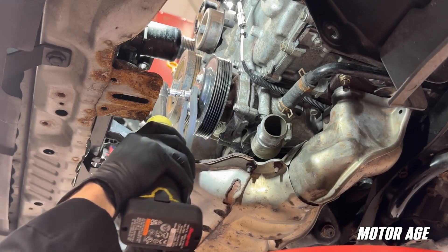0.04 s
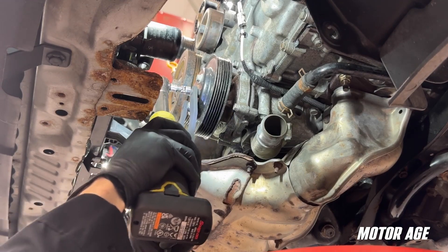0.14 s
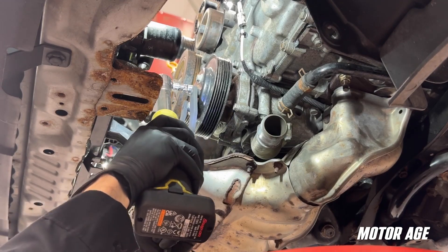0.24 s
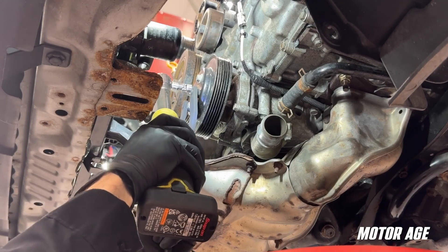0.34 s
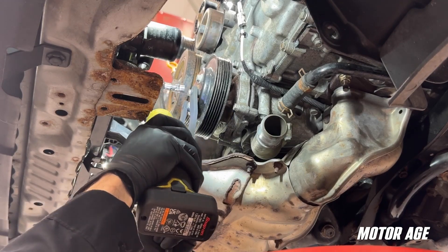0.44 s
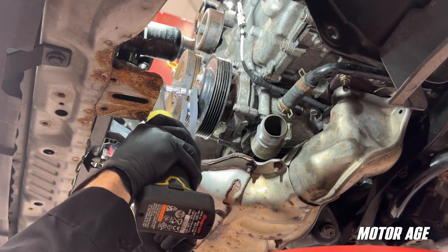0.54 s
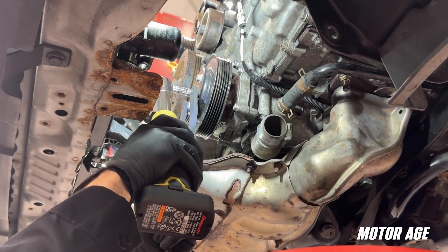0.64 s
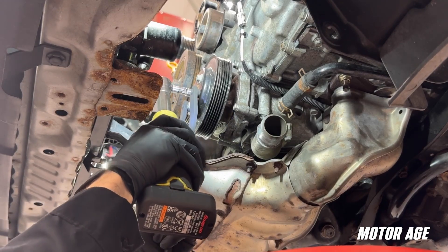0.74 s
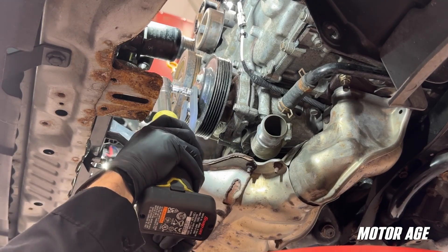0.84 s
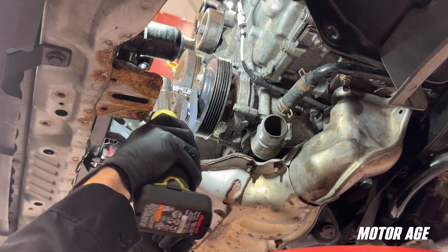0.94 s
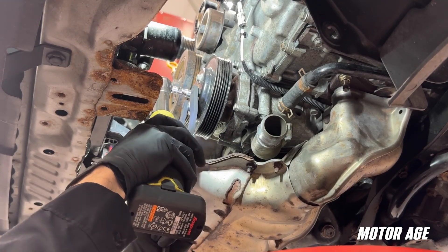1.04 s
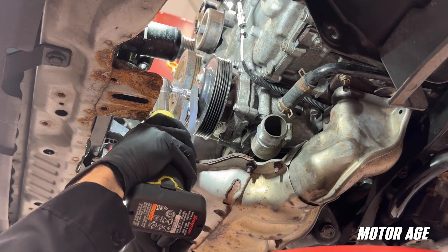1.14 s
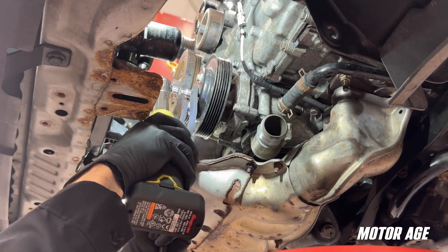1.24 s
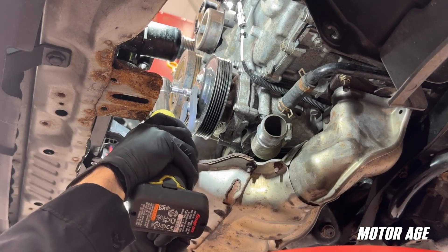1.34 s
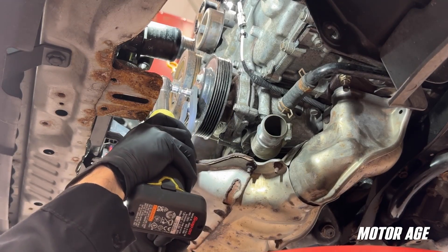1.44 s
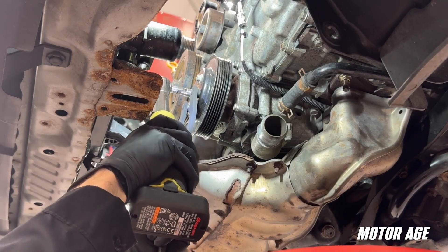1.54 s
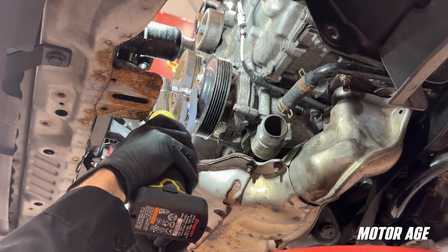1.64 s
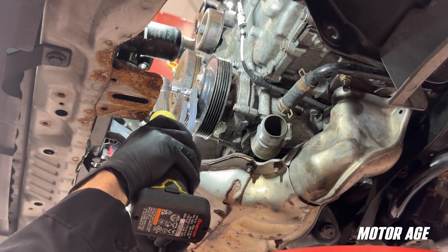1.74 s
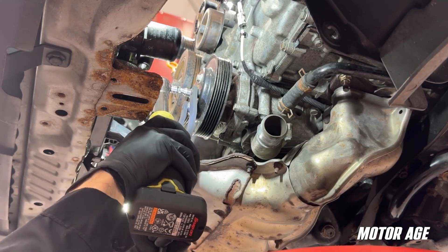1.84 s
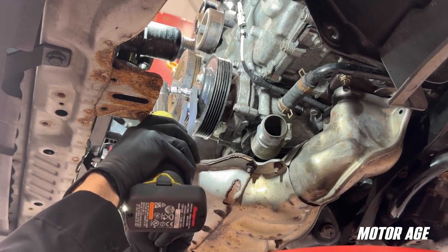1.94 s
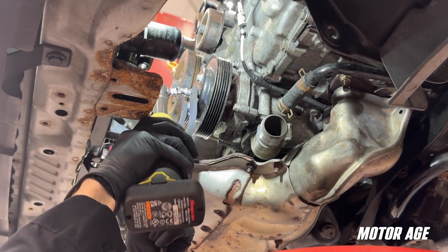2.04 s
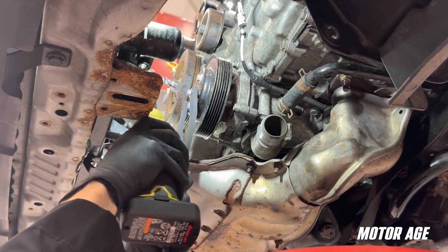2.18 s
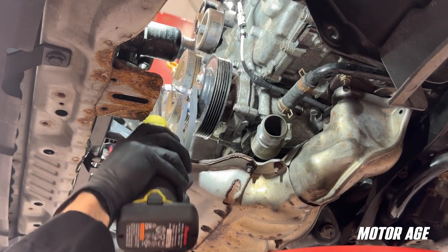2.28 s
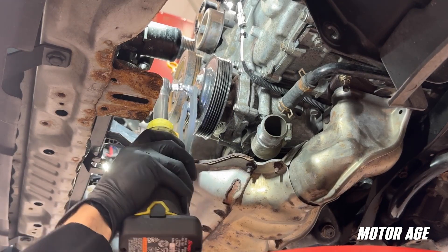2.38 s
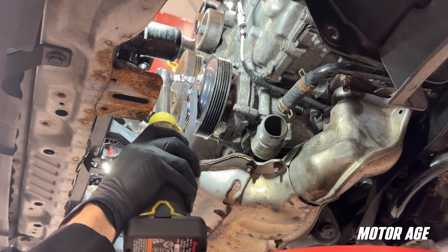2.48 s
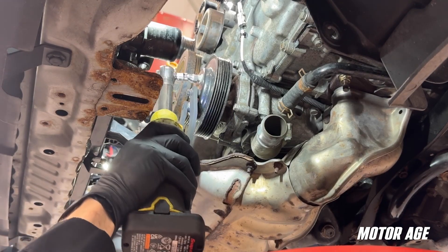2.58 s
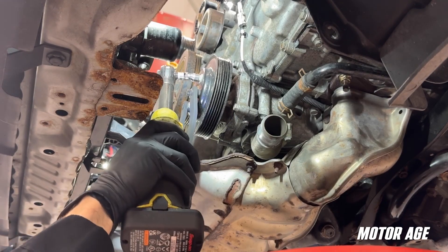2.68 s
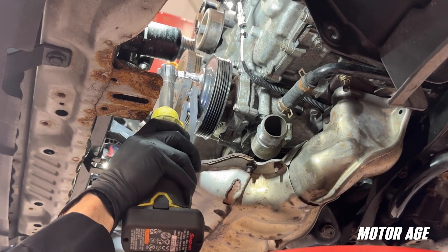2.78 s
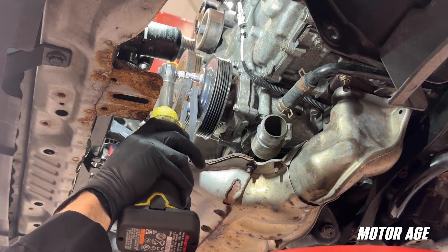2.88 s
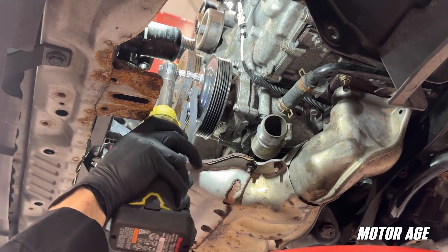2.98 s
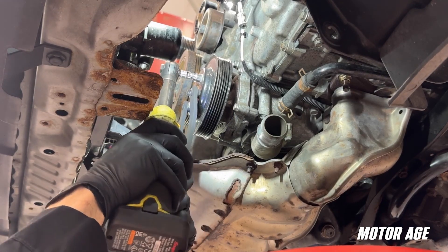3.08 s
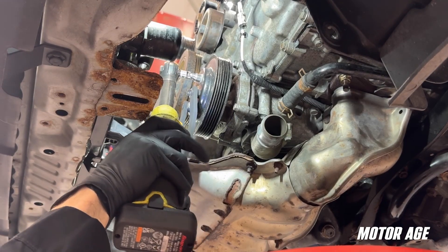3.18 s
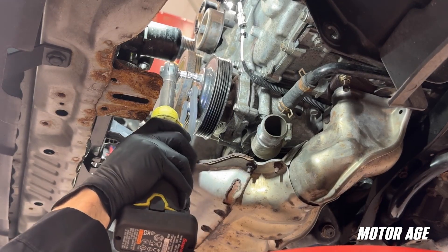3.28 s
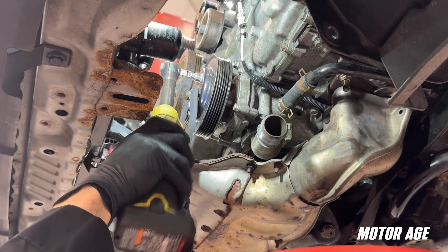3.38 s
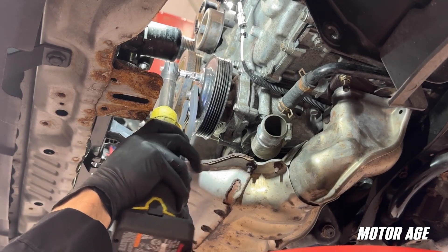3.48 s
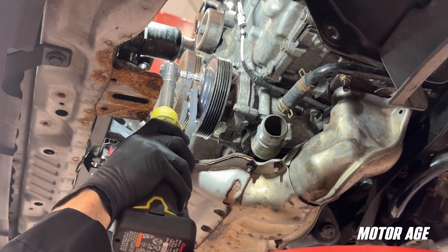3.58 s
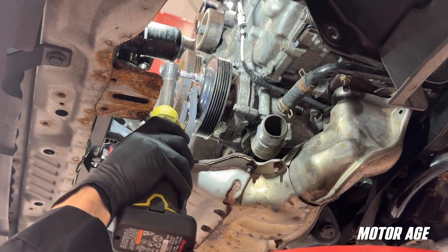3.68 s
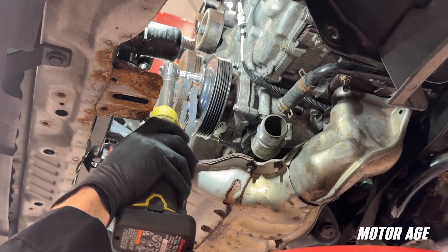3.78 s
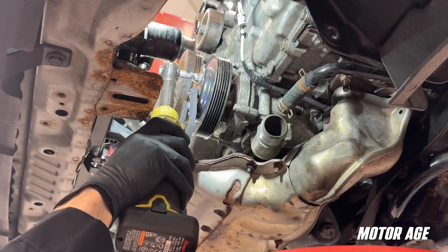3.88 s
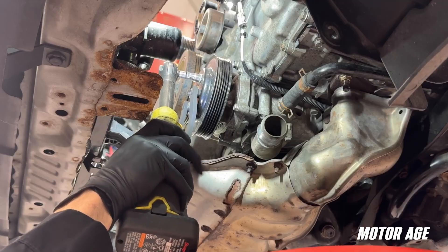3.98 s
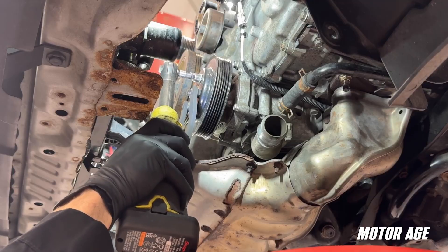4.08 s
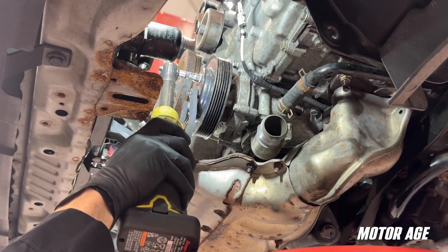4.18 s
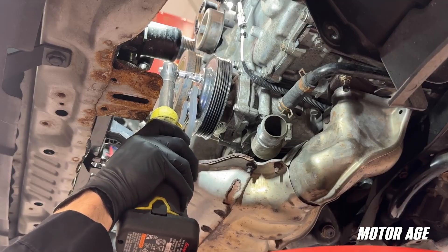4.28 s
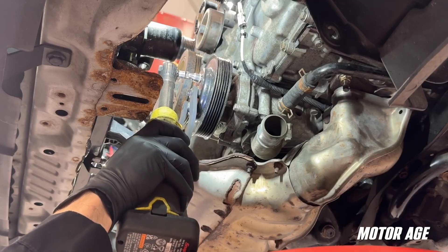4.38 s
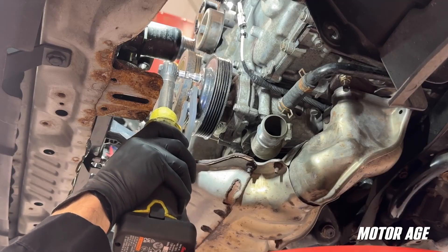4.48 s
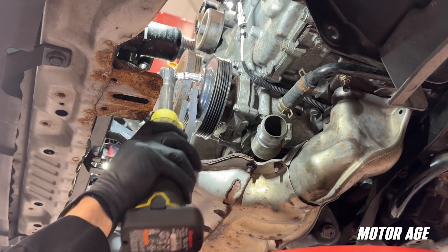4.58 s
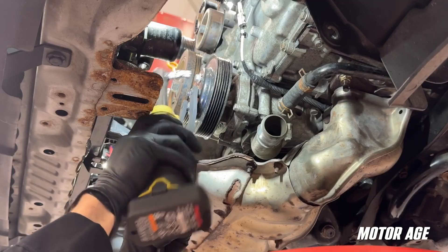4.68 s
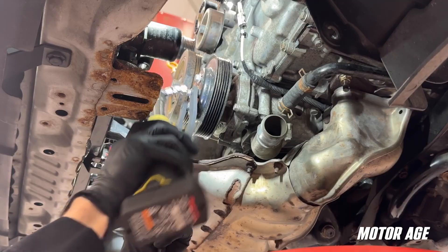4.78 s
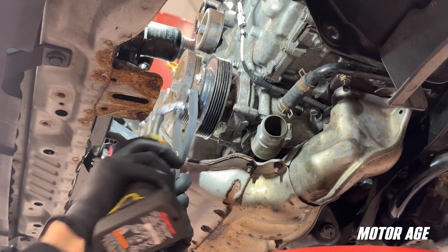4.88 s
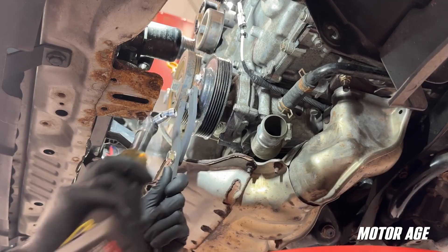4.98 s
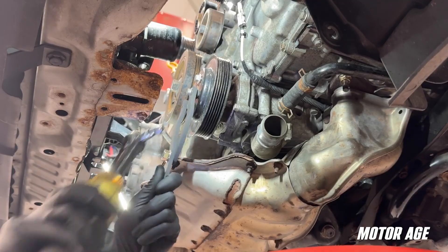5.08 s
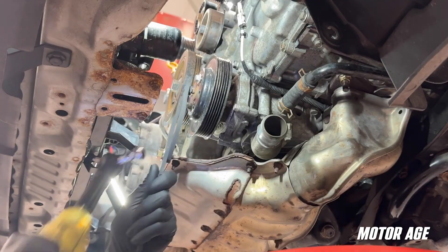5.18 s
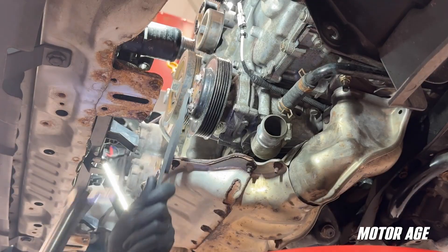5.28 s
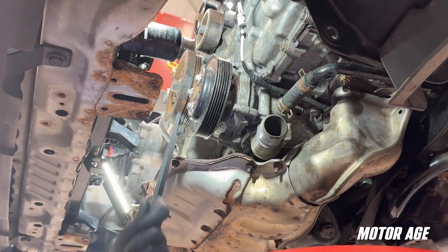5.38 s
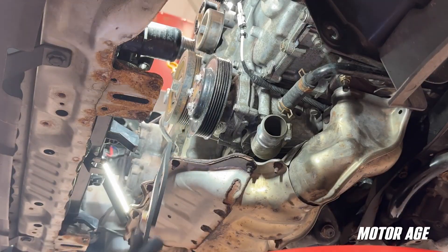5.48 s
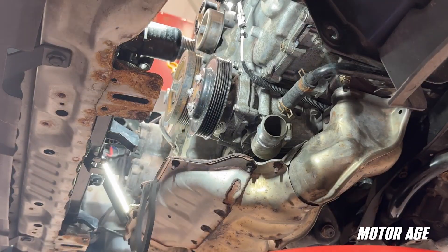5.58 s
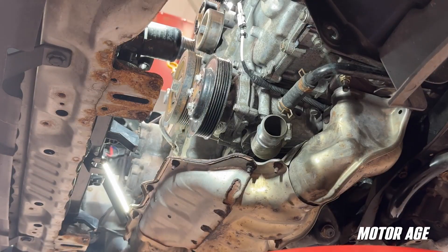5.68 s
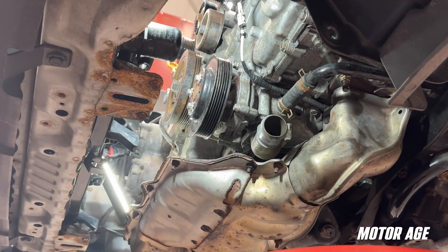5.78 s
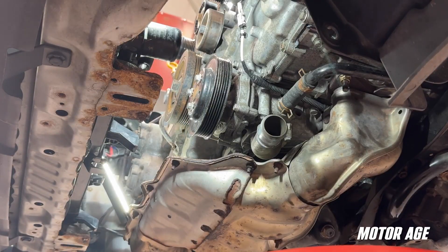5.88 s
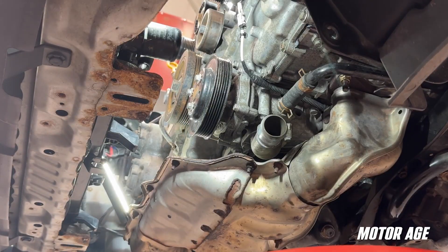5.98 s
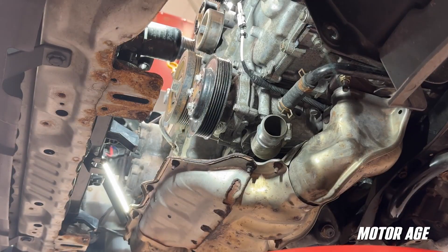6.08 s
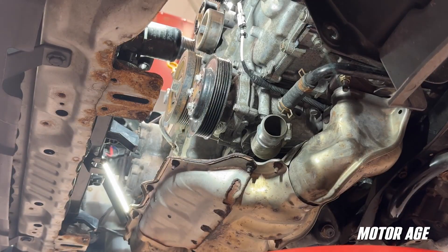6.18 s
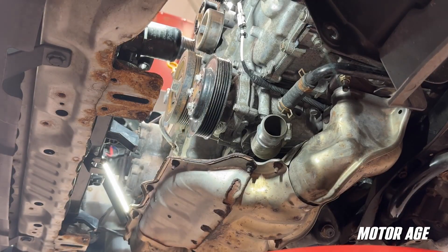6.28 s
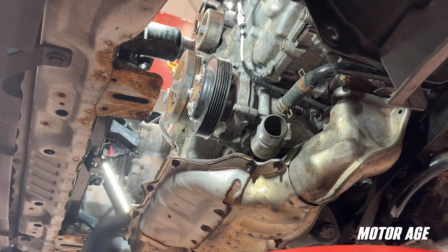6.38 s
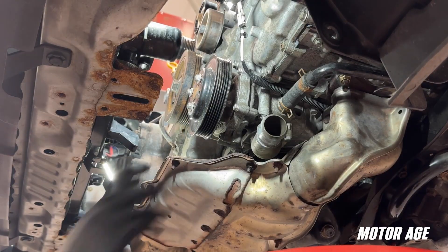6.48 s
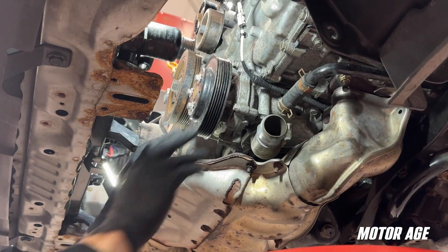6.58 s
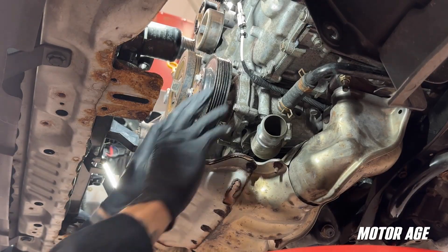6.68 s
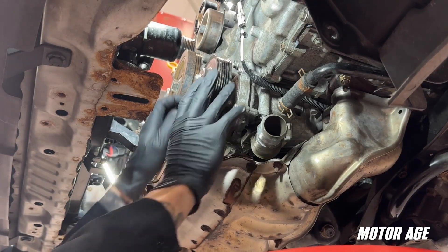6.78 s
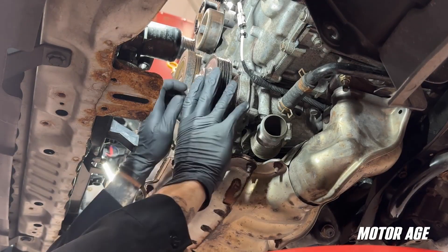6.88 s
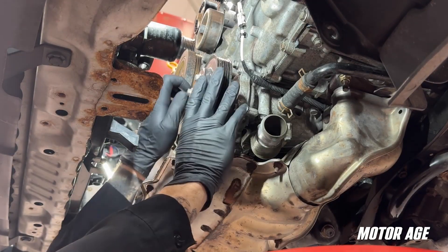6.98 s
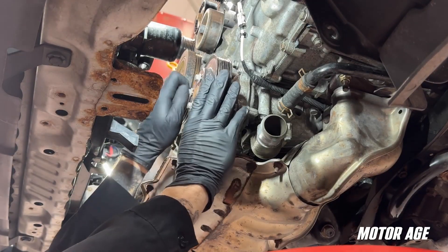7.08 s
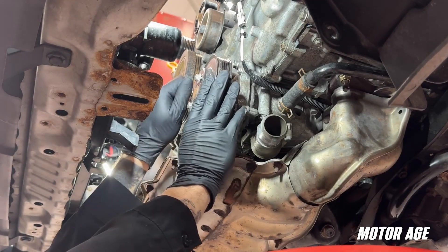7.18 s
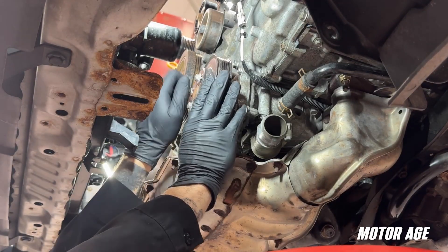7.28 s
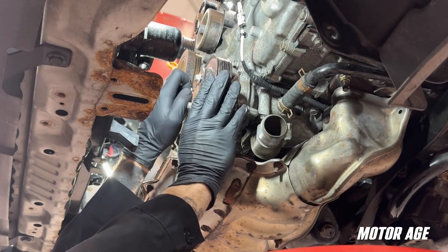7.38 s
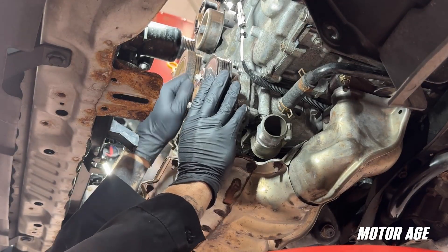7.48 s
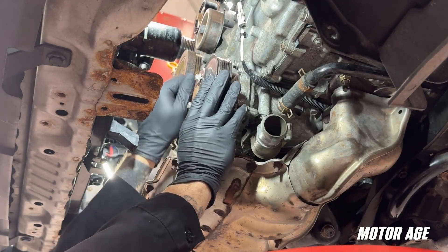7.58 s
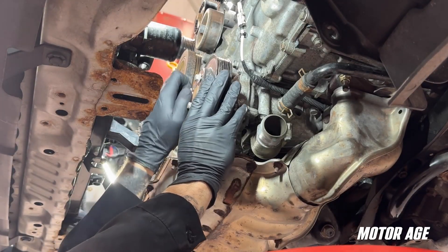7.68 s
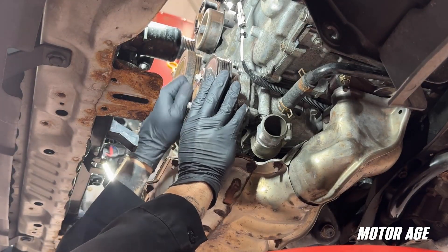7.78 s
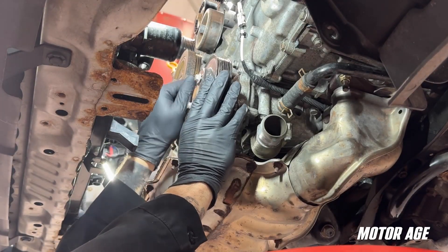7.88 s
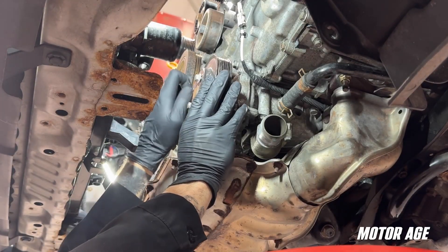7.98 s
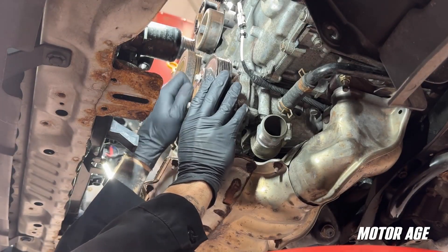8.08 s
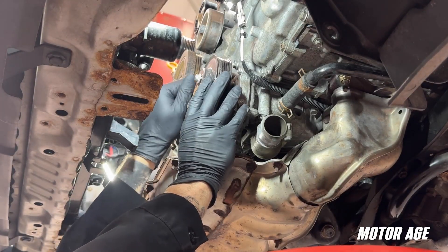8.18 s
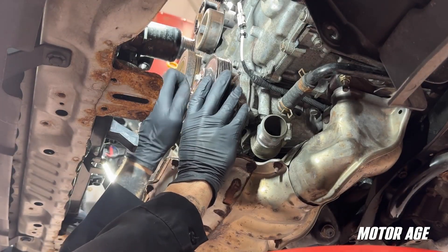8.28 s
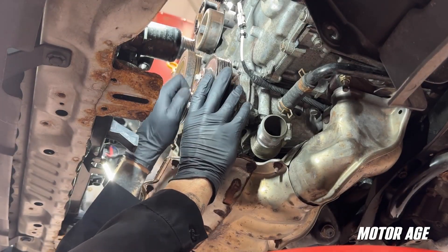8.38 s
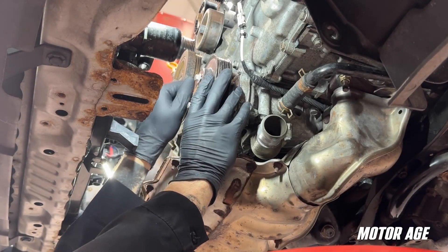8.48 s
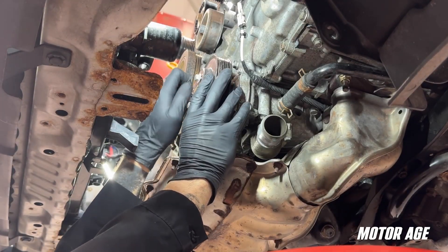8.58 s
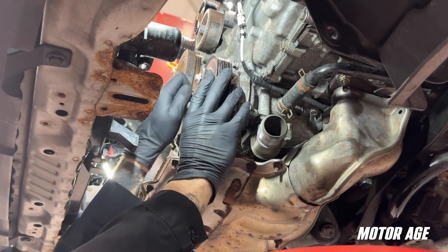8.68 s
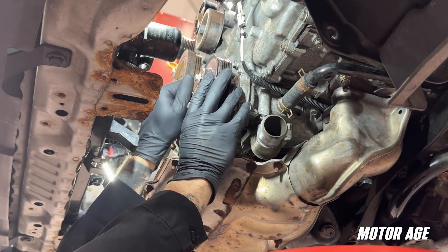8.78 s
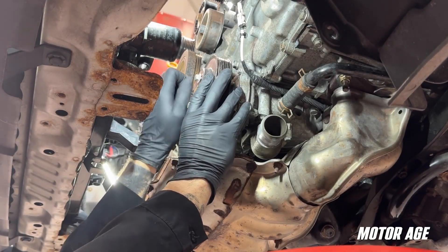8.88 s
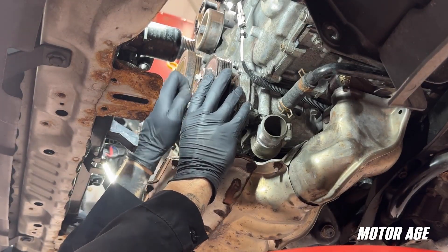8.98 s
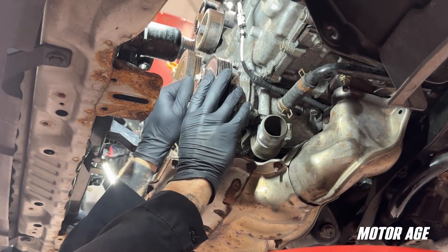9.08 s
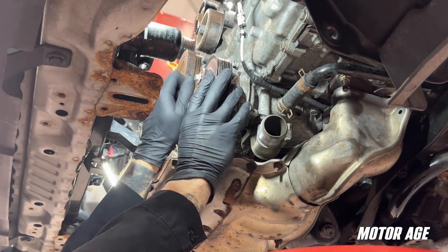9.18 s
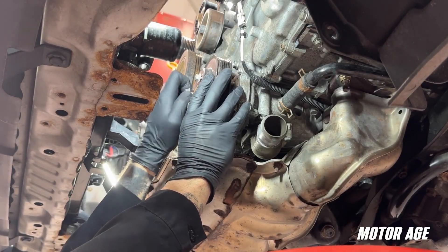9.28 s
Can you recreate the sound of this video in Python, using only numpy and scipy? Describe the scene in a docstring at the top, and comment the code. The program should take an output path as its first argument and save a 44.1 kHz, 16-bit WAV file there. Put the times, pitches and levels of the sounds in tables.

```python
"""First comes a low ventilation rumble, with the echo of an earlier burst dying away in a workshop.
Then a cordless driver, close by, backs two pulley bolts out under a car, with four trigger pulls a bolt.
Its motor spins up and coasts down; its hammer knocks three times a cycle, louder with speed: shaped bursts of noise.
The tool clunks on and off the bolt heads (dying noise), and a steel holding wrench clinks free (ringing sines).
Last, gloved fingers turn a loose bolt in even strokes: trains of tiny random slips and snaps of noise."""
import sys
import numpy as np
from scipy import signal
from scipy.fft import rfft, irfft
from scipy.io import wavfile
from scipy.ndimage import uniform_filter1d

SR = 44100
rng = np.random.default_rng(int(sys.argv[2]) if len(sys.argv) > 2 else 0)


def wav_out(sig):
    """Save sig, one row per channel (or a flat mono array), as 16-bit PCM at SR to the path in sys.argv[1]."""
    wavfile.write(sys.argv[1], SR, np.round(np.clip(np.atleast_2d(sig).T, -1, 1) * 32767).astype(np.int16))


N = 411894
TIME = np.arange(N) / SR


def gain_of(db):
    """Turns decibels into amplitude."""
    return 10 ** (np.asarray(db) / 20)


def evened(x):
    """Scales a sound to an rms of 1."""
    return x / np.sqrt(np.mean(x ** 2) + 1e-20)


def read(points, hz):
    """Reads between the points of a spectrum table, along a log-frequency axis."""
    f, value = np.transpose(points)
    return np.interp(np.log(hz + 1), np.log(f + 1), value)


def peaks_db(modes, hz):
    """Resonances as rounded peaks in dB, from rows of (f/Hz, width/Hz, level/dB)."""
    return sum(db / (1 + (2 * (hz - f) / width) ** 2) for f, width, db in modes)


def add(mix, s, sound):
    """Mixes a sound in at time s, cut off at the end of the mix."""
    part = mix[round(s * SR):][:len(sound)]
    part += sound[:len(part)]


def coloured(x, db_at, size=4096):
    """Filters without pre-ringing to the colour db_at(Hz); white noise keeps its overall level."""
    hz = abs(np.fft.fftfreq(size, 1 / SR))
    log_gain = np.log(gain_of(np.maximum(db_at(hz), -100)))
    # the Hilbert transform gives the minimum-phase response
    taps = np.fft.ifft(np.exp(np.conj(signal.hilbert(log_gain)))).real
    return signal.oaconvolve(x, taps / np.linalg.norm(taps))[:len(x)]


def dying_noise(seconds, db_at, t60_at, size=128):
    """Noise in which every band has its own level and its own time to fall by 60 dB."""
    n = int(seconds * SR)
    gain = gain_of(db_at(np.fft.rfftfreq(n, 1 / SR)))
    noise = irfft(rfft(rng.standard_normal(n)) * gain, n)
    hz, t, z = signal.stft(noise, SR, nperseg=size)
    fade = gain_of(-60 * t / t60_at(hz)[:, None])
    return signal.istft(z * fade, SR, nperseg=size)[1]


def grains(size, per_s, spread_db):
    """A random train of small slips, a few of them large."""
    slips = (rng.random(size) < per_s / SR) * rng.standard_normal(size)
    size_db = spread_db * np.minimum(rng.exponential(1, size), 4)
    return evened(slips * gain_of(size_db))


# colour of the moving air: (f/Hz, relative level/dB)
AIR_COLOUR = [(20, -1), (55, 1.5), (90, -5), (180, -15.5), (300, -22), (550, -23.5), (750, -22),
              (1050, -24), (1380, -20), (1650, -35), (2500, -41.5), (6000, -48), (12000, -54.5),
              (14000, -61)]


def ventilation(level_db=-57):
    """Moving air: steady noise, strongest in the bass."""
    gain = gain_of(read(AIR_COLOUR, np.fft.rfftfreq(N, 1 / SR)))
    air = irfft(rfft(rng.standard_normal(N)) * gain, N)
    return gain_of(level_db) * evened(air)


def hum(peak_s, hz, db, rise_db_per_s, fall_db_per_s, waver_hz=0.92, sag_hz_per_s=1):
    """A distant machine: a wavering tone that swells, fades and slowly sags in pitch."""
    t = TIME - peak_s
    waver = waver_hz * evened(uniform_filter1d(rng.standard_normal(N), size=6000))
    turns = np.cumsum(hz - sag_hz_per_s * t + waver) / SR
    level_db = db + np.minimum(rise_db_per_s * t, -fall_db_per_s * t)
    return np.sqrt(2) * gain_of(level_db) * np.sin(2 * np.pi * turns)


# hums of distant machines: (loudest at t/s, f/Hz then, rms level/dB then, rise/dB per s, fall/dB per s)
MACHINE_HUMS = [(2.2, 127.3, -58, 4, 14), (6.7, 370.6, -69, 100.5, 8)]


def background():
    """Ventilation rumble and the hums of distant machines, added together."""
    return ventilation() + sum(hum(*row) for row in MACHINE_HUMS)


# how long the hall's echo takes to fall by 60 dB: (f/Hz, time/s)
HALL_DECAY = [(150, 2.5), (600, 0.45), (3000, 1.33), (6000, 1), (10000, 0.5), (16000, 0.64)]
# colour of that echo: (f/Hz, level/dB before it dies away)
HALL_COLOUR = [(150, -22), (1000, -26.5), (2500, -17), (3400, -23), (6000, -25.5), (16000, -27.5)]


def workshop(x, near_db=-10.0, near_t60_s=0.085, earlier_db=-37):
    """Quick reflections from the underbody and the long tail of the hall, still dying from an earlier burst."""
    near = dying_noise(.1, np.zeros_like, lambda hz: np.full(len(hz), near_t60_s))
    hall = dying_noise(1.5, lambda hz: read(HALL_COLOUR, hz), lambda hz: read(HALL_DECAY, hz))
    echo = hall * np.sqrt(np.log(10 ** 6) / SR)  # sets the echo's energy for a 1 s decay
    add(echo, .002, gain_of(near_db) * near / np.linalg.norm(near))
    wet = signal.fftconvolve(x, echo)[:N]
    # the earlier burst has the driver's colour, but its treble is already gone
    earlier = coloured(hall, lambda hz: tool_db(hz) - (hz / 3400) ** 2)
    add(wet, 0, gain_of(earlier_db) * earlier)
    return wet


def rub(seconds, db, centre_hz, octaves):
    """One stroke swells and fades: uneven slips in one broad resonance."""
    slips = grains(SR, 5000, 2.2)[:max(int(seconds * SR), 2000)]

    def hump_db(hz):
        away = np.log2((hz + 1) / centre_hz) / octaves
        return -45 * np.log10(1 + away ** 2 / 2)

    stroke = coloured(slips, hump_db)
    return gain_of(db) * evened(stroke) * signal.windows.tukey(len(stroke), .6)


# clothing and gloves rubbing: (start t/s, end t/s, level/dB before the fades and waver, centre f/Hz, octaves)
CLOTH_RUBS = [(5.83, 6.2, -58.5, 260, 1.83), (6.02, 6.325, -52.5, 64, 0.94),
              (5.819, 6.18, -70.5, 3750, 1.13), (6.278, 6.703, -61.5, 117.8, 2),
              (6.5, 6.65, -60, 2220, 0.91), (6.749, 6.867, -52, 3380, 1.12),
              (6.774, 6.871, -51.5, 1350, 0.16), (6.785, 6.875, -53.5, 706, 1.8)]


def rubs(waver_db=2.0):
    """Sleeves and gloves brush past with a wavering grip."""
    out = np.zeros(N)
    grip = gain_of(waver_db * evened(uniform_filter1d(rng.standard_normal(N), size=500)))
    for start, end, db, centre_hz, octaves in CLOTH_RUBS:
        add(out, start, rub(end - start, db, centre_hz, octaves))
    return out * grip


def crinkle(snap_db=-7, snap_s=0.0058, crease_db=-17, crease_s=0.023):
    """Rubber creases, snaps a tenth of a second in, and relaxes."""
    t = np.arange(-SR // 10, SR // 10) / SR
    snap = (t >= 0) * np.exp(-abs(t) / snap_s) * rng.standard_normal(len(t))
    crease = np.exp(-abs(t) / crease_s) * grains(len(t), 2000, 1.5)
    return gain_of(snap_db) * snap + gain_of(crease_db) * crease


# how strongly the gloves rustle: (t/s, level/dB before the slide setting and the scuffs)
GLOVE_RUSTLE = [(5.5, -77), (5.98, -73.5), (6.38, -75.5), (6.63, -64), (6.88, -76.5), (9.33, -79)]
# colour of the rubber: (f/Hz, relative level/dB)
GLOVE_COLOUR = [(900, -22), (2000, 3.5), (3200, -5.5), (5500, 2), (8000, -2), (12000, -9), (16000, -12)]
# fingers turning a loose bolt: first turn, time between turns, length of a rub, delay until the glove snaps free
FIRST_TURN_S, TURN_EVERY_S, TURN_RUB_S, LET_GO_S = 7.17, .331, 0.053, .115
# each turn's rub: centre, typical level of the first, and the growth as the grip firms
TURN_HZ, TURN_DB, FIRMER_DB_PER_TURN = 2180, -74.5, 0.94


def gloves(slide_db=-2, scuff_db=4.5, crinkle_db=-57, stray_db=-62, spread_db=1.5, uneven_s=0.015,
           rub_octaves=0.45):
    """Fingers slide in short scuffs; each turn is a rub and a snap of rubber, with stray crinkles too."""
    s, db = np.transpose(GLOVE_RUSTLE)
    scuffs_db = scuff_db * evened(uniform_filter1d(rng.standard_normal(N), size=2600))
    rustle_db = np.interp(TIME, s, db, left=-120) + slide_db + scuffs_db
    rubber = gain_of(rustle_db) * grains(N, 1500, 2.9)
    strokes = np.zeros(N)
    for turn, start in enumerate(np.arange(FIRST_TURN_S, TIME[-1], TURN_EVERY_S)):
        late, force = rng.standard_normal(2)
        late_s = uneven_s * late
        firm_db = FIRMER_DB_PER_TURN * turn
        stroke = rub(TURN_RUB_S, TURN_DB + firm_db - spread_db * force, TURN_HZ, rub_octaves)
        add(strokes, start + late_s, stroke)
        # the crinkle starts a tenth of a second before its snap
        add(rubber, start + LET_GO_S + late_s - 1 / 10, gain_of(crinkle_db + firm_db) * crinkle())
        stray = gain_of(stray_db + spread_db * force) * crinkle()
        add(rubber, start + TURN_EVERY_S * rng.random(), stray)
    return strokes + coloured(rubber, lambda hz: read(GLOVE_COLOUR, hz))


def ringing(modes, db, tilt_db, free_db, contact_s=0.00802, uneven_db=2.5, tick_db=-3, tick_s=.006,
            grip_detune=0.0033):
    """Struck steel: a scrape of contact damps the modes quickly, then a faint free ring is left."""
    hz, mode_db, t60 = np.transpose(modes)[:, :, None]
    hz = hz * (1 + grip_detune * rng.standard_normal(hz.shape))  # the grip differs from touch to touch
    t = np.arange(SR) / SR
    size_db = mode_db + tilt_db * np.log2(hz / hz.mean()) + uneven_db * rng.standard_normal(hz.shape)
    tones = np.sin(2 * np.pi * (hz * t + rng.random(hz.shape)))
    ring = (gain_of(size_db - 60 * t / t60) * tones).sum(0)
    damping = np.exp(-t / contact_s) + gain_of(free_db)
    tick = gain_of(tick_db) * np.exp(-t / tick_s) * rng.standard_normal(len(t))
    return gain_of(db) * (ring * damping + tick)


# the socket touching a bolt head: (t/s, level/dB before the modes' own levels)
SOCKET_TOUCHES = [(0.625, -50.5), (2.623, -44.5), (2.635, -49)]
# how the socket rings: (f/Hz, relative level/dB, time to fall 60 dB/s when free)
SOCKET_MODES = [(5292, -1, 0.28), (5470, -2, .13), (9350, -8, 0.36), (12410, -29, .2), (13520, -13.5, 0.17)]


def socket_tinks(free_db=-15):
    """Light touches of the socket set its steel ringing."""
    out = np.zeros(N)
    for s, db in SOCKET_TOUCHES:
        add(out, s, ringing(SOCKET_MODES, db, 0, free_db))
    return out


# the holding wrench touching the pulley, which also thuds: (t/s, relative level/dB, hardness/dB per octave)
WRENCH_TOUCHES = [(5.118, -49.5, 1.5), (5.129, -46.5, 3), (5.269, -38, -1), (5.275, -32.5, 0.5),
                  (5.301, -35.5, 0), (5.315, -34.5, -5.5), (5.36, -49.5, -6), (6.395, -47, -4),
                  (6.408, -52, -3), (6.623, -38, 12)]
# how the wrench rings: (f/Hz, relative level/dB, time to fall 60 dB/s when free)
WRENCH_MODES = [(2540, -7, 0.4), (2573, -19, 2), (2650, -12, 0.36), (3300, -5, 0.24), (4563, 5.5, 0.075),
                (4950, -8, .22), (5620, -7, .33), (6220, -3.5, 0.3), (6155, -10, 0.45), (7200, -12.5, 0.61),
                (7570, -6, 0.13), (8340, -18, .15), (9330, -21, 0.73), (10890, -22, 0.37)]


def wrench_clinks(level_db=-5, free_db=-17):
    """Touches of the holding wrench set its steel ringing, brighter when hard."""
    out = np.zeros(N)
    for s, db, tilt_db in WRENCH_TOUCHES:
        add(out, s, ringing(WRENCH_MODES, db + level_db, tilt_db, free_db))
    # laid down, the wrench gives one thin ping
    add(out, 5.808, ringing([(6020, 0, 1.5)], -54.5, 0, -20, contact_s=0.0093, tick_db=-22))
    return out


# resonances of the struck pulley and bracket: (f/Hz, width/Hz, level/dB over the colour)
BRACKET_PEAKS = [(610, 71, 5.5), (760, 80, 6), (1286, 77, 10), (1530, 41, -0.5), (2050, 120, 3.5),
                 (2630, 150, 3.5)]


def clunk(db, hard_db, ring, level_db=3, tail_db=-19.5, tail_t60_s=0.61, rise_s=0.0013):
    """A heavy, well damped part: the treble dies at once, the low body rings on."""
    # rows of (f/Hz, time to fall 60 dB/s), then two of (f/Hz, relative level/dB)
    t60 = [(200, 0.073), (1300, 0.1), (3000, 0.043), (12000, .03)]
    colour = [(60, -8), (170, 2.5), (300, -2), (500, 7.0), (950, 7.5), (1350, 7.0), (2600, hard_db + 5),
              (5000, hard_db + 8.5), (8000, hard_db + 5.5), (16000, hard_db - 3.5)]
    body = [(60, -1), (170, 14.5), (550, 15), (1400, 3.5), (4000, -10.5), (12000, -27.5)]
    blow = dying_noise(0.18, lambda hz: read(colour, hz) + peaks_db(BRACKET_PEAKS, hz),
                       lambda hz: ring * read(t60, hz))
    tail = dying_noise(0.44, lambda hz: read(body, hz), lambda hz: np.full(len(hz), ring * tail_t60_s))
    out = ring * gain_of(tail_db) * tail
    add(out, 0, blow * (1 - np.exp(-TIME[:len(blow)] / rise_s)))
    return gain_of(db + level_db) * out


# dull blows of tool and hands on the engine:
# (t/s, relative level/dB, hardness as treble over bass/dB, ring length as a factor)
ENGINE_BLOWS = [(.623, -57, 1, 0.92), (.647, -38.5, -7, 0.4), (.918, -40.5, -9.5, 0.59),
                (2.238, -31, -3.5, 1.3), (3.028, -51, -13, 0.71), (3.051, -34, -9.5, 0.43),
                (3.352, -42, -4, 1.2), (3.424, -11, -3, 0.46), (4.722, -32.5, -8.5, 1.1),
                (4.749, -31.5, -9, 0.91), (4.863, -50, 10, 0.53), (4.927, -60.5, 17, 0.14),
                (5.613, -59, -1, 0.55), (5.87, -50, -11, .85), (6.088, -58.5, -1, 0.81),
                (6.313, -51, -23, 0.8), (8.948, -55.5, -11.5, 0.56), (9.071, -68.5, 9.5, .3)]


def clunks(thud_db=-13, glancing_octaves=3.3, thud_hard_db=-3, thud_ring=1.2):
    """Blows on the engine; each wrench clink also thuds the pulley, less so when hard and glancing."""
    out = np.zeros(N)
    for s, db, hard_db, ring in ENGINE_BLOWS:
        add(out, s, clunk(db, hard_db, ring))
    for s, db, tilt_db in WRENCH_TOUCHES:
        level_db = db + thud_db - glancing_octaves * max(tilt_db, 0)
        add(out, s, clunk(level_db, thud_hard_db, thud_ring))
    return out


# pulls of the trigger, four a bolt: (pressed t/s, released t/s, relative level/dB)
TRIGGER_PULLS = [(.963, 1.056, 2.2), (1.2, 1.302, 1.5), (1.417, 1.528, 0.1), (1.62, 1.746, 0.33),
                 (3.391, 3.494, -3), (3.661, 3.778, 0.13), (3.882, 3.992, 0.3), (4.151, 4.271, 0.53)]
# the motor: speed it is drawn towards (hammer cycles a second), spin-up time,
# and its slowing by friction and drag once released
TOP_HZ, SPIN_UP_S, FRICTION_HZ_PER_S, DRAG_S = 125.46, .052, 435, 1.35


def motor_speed():
    """Hammer cycles a second: each pull draws the motor towards top speed; released, it coasts down."""
    rate, friction_hz = np.zeros(N), FRICTION_HZ_PER_S * DRAG_S
    for pressed, released, _ in TRIGGER_PULLS:
        at = round(pressed * SR)
        t = TIME[at:][:SR]
        held_s = np.minimum(t, released) - pressed
        free_s = np.maximum(t - released, 0)
        driven = TOP_HZ + (rate[at] - TOP_HZ) * np.exp(-held_s / SPIN_UP_S)
        coasting = (driven + friction_hz) * np.exp(-free_s / DRAG_S) - friction_hz
        rate[at:at + SR] = np.maximum(coasting, 0)
    return np.maximum(uniform_filter1d(rate, size=1100), 0)  # the motor's inertia smooths its changes of speed


def scraped(strikes, contact_s):
    """Each strike is a burst of tiny steel contacts (noise) that dies away over contact_s."""
    power = signal.lfilter([1], [1, -np.exp(-2 / (contact_s * SR))], strikes ** 2 + 1e-18)
    return np.sqrt(power) * rng.standard_normal(len(strikes))


# the three knocks within one hammer cycle: relative level/dB of each
KNOCK_LEVELS = [-2, -8, -7]
# the rattle: level at top speed (before pull strength and tool level), and growth for a tenfold speed
RATTLE_DB, SPEED_DB_PER_DECADE = -19, 31.5


def hammering(rate, uneven_db=1.5, jitter_beats=.03, contact_s=0.0013, chatter_per_cycle=11, chatter_db=-9,
              chatter_growth=1.2, ring_s=0.0081, ring_db=-6):
    """Three knocks a cycle; the loose socket chatters between, more at speed. Loudness follows speed."""
    pressed, released, strength_db = np.transpose(TRIGGER_PULLS)
    speed_db = SPEED_DB_PER_DECADE * np.log10(rate / TOP_HZ + 1e-9)
    pull_db = np.interp(TIME, (pressed + released) / 2, strength_db)
    level_db = RATTLE_DB + speed_db + pull_db
    beats = 3 * np.cumsum(rate) / SR
    beat = np.arange(1, int(beats[-1]))
    late, force = rng.standard_normal((2, len(beat)))
    at = np.searchsorted(beats, beat + jitter_beats * late).clip(0, N - 1)
    strikes = np.zeros(N)
    strikes[at] = gain_of(np.take(KNOCK_LEVELS, beat, mode="wrap") + uneven_db * force)
    chatter = (rng.random(N) < chatter_per_cycle * rate / SR) * rng.rayleigh(np.sqrt(.5), N)
    strikes += gain_of(chatter_db) * (rate / rate.max()) ** chatter_growth * chatter
    # a short contact and a longer ring
    rattle = evened(scraped(strikes, contact_s)) + gain_of(ring_db) * evened(scraped(strikes, ring_s))
    # even out the slow loudness, so that level_db alone sets it
    mean_power = uniform_filter1d(uniform_filter1d(rattle ** 2, size=1400), size=1400)
    return gain_of(level_db) * rattle / np.sqrt(abs(mean_power) + 1e-6)


# broad colour of the rattling tool: (f/Hz, relative level/dB)
TOOL_COLOUR = [(100, -24.5), (240, -16.5), (440, -4), (700, -2.5), (1050, 2.5), (1900, -1.5), (2250, -6),
               (2700, -5), (3300, 1.5), (5000, 1.5), (6200, -1), (10000, 0), (11200, -8.5), (14200, -4.5),
               (16000, -16)]
# resonances of its gear case and socket: (f/Hz, width/Hz, level/dB over the colour)
CASE_PEAKS = [(1370, 90, 3.5), (1810, 220, 3.5), (3373, 180, 4.5), (3560, 99, 3), (4910, 120, 4.5),
              (7600, 300, -0.5), (9970, 120, 0.5), (12730, 300, 5), (13440, 220, 5)]


def tool_db(hz):
    """The driver's broad colour with its case resonances on top."""
    return read(TOOL_COLOUR, hz) + peaks_db(CASE_PEAKS, hz)


# the gears taking up their slack before each bolt: (t/s, starting level/dB before the tool level)
GEAR_RUN_UPS = [(.893, -57), (3.333, -56.5)]
# how long that whirr lasts, and how fast it grows
RUN_UP_S, RUN_UP_DB_PER_S = .09, 130.5
# single hammer blows as the tool catches, breaks a bolt loose and stops: (t/s, relative level/dB)
HAMMER_BLOWS = [(.950, -20), (.972, -17.5), (1.010, -0.5), (1.216, -10.5), (1.920, -29.5), (3.411, -21),
                (3.428, -4), (3.4418, 6), (3.606, -12), (3.676, -11)]


def driver(blow_s=.0013, blow_db=-7, level_db=-3.0, side_share=.85, spacing_hz=2300):
    """Gears whirr up, then rattle and blows sound through the case; its two sides favour interleaved bands."""
    out, rate, t = np.zeros(N), motor_speed(), TIME[:SR // 5]
    for side in (-1, 1):
        steel = hammering(rate)
        for s, db in GEAR_RUN_UPS:
            whirr = gain_of(db + RUN_UP_DB_PER_S * t) * (t < RUN_UP_S) * grains(len(t), 4000, 2)
            add(steel, s, whirr)
        for s, db in HAMMER_BLOWS:
            add(steel, s, gain_of(db + blow_db) * np.exp(-t / blow_s) * rng.standard_normal(len(t)))

        def side_db(hz):
            bands = 1 + side * side_share * np.sin(2 * np.pi * hz / spacing_hz)
            return tool_db(hz) + 10 * np.log10(bands)

        out += coloured(steel, side_db)
    return gain_of(level_db) * out


def scene():
    """All the work, its echo and the background."""
    work = gloves() + rubs() + socket_tinks() + wrench_clinks() + clunks() + driver()
    return (background() + workshop(work) + work)[None]


def record(dry, ceiling=.85, edge_hz=16050):
    """The recorder flattens peaks above its ceiling, then cuts the treble at its band limit."""
    held = np.clip(dry, -ceiling, ceiling)
    low_pass = signal.firwin(511, edge_hz, window=("kaiser", 9), fs=SR)
    return signal.oaconvolve(held, low_pass[None], "same")


dry = scene()
out = record(dry)
wav_out(out)
```